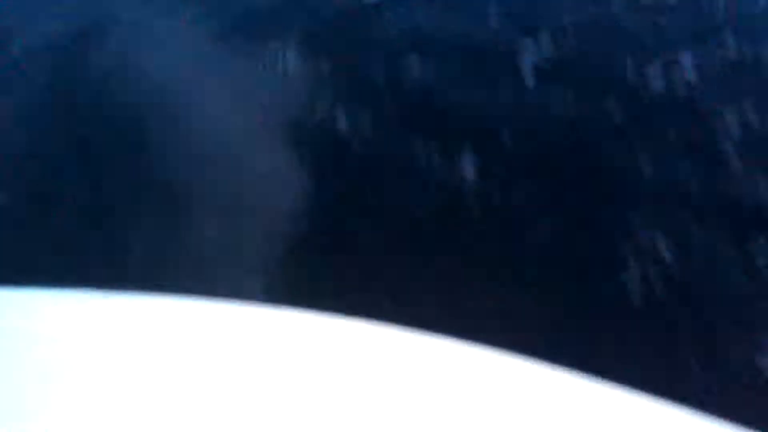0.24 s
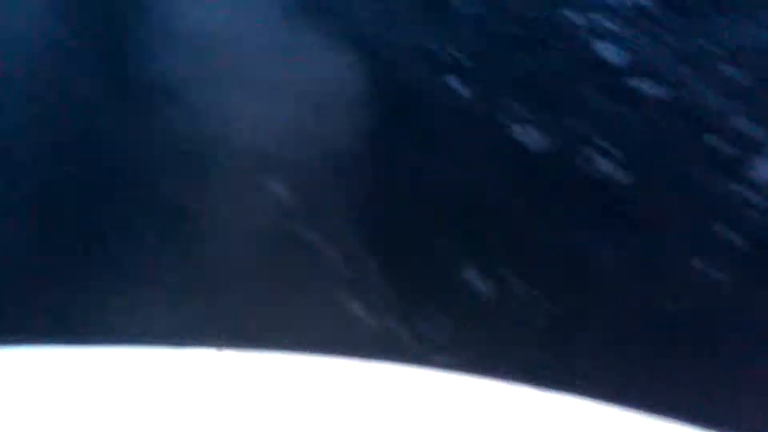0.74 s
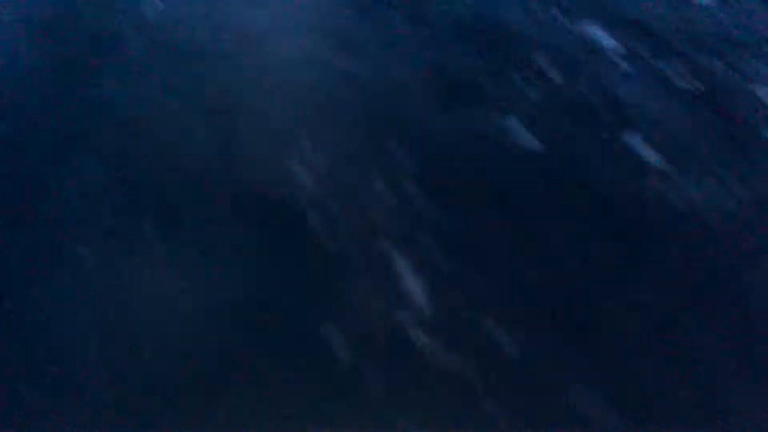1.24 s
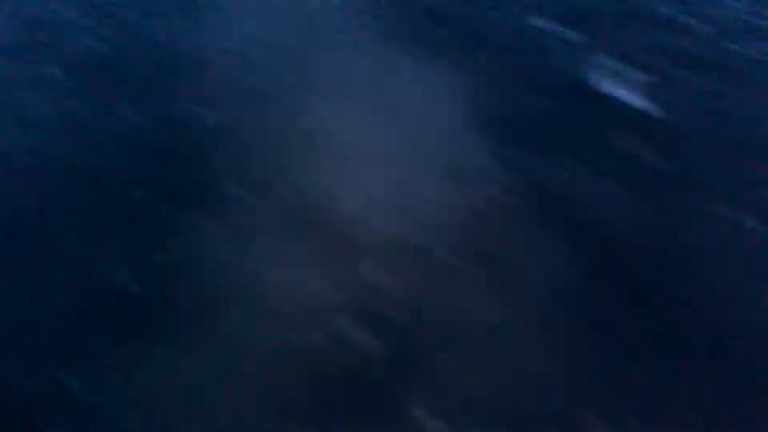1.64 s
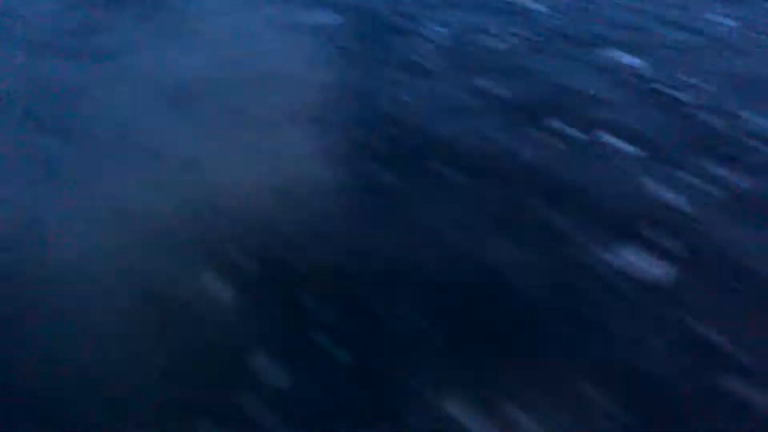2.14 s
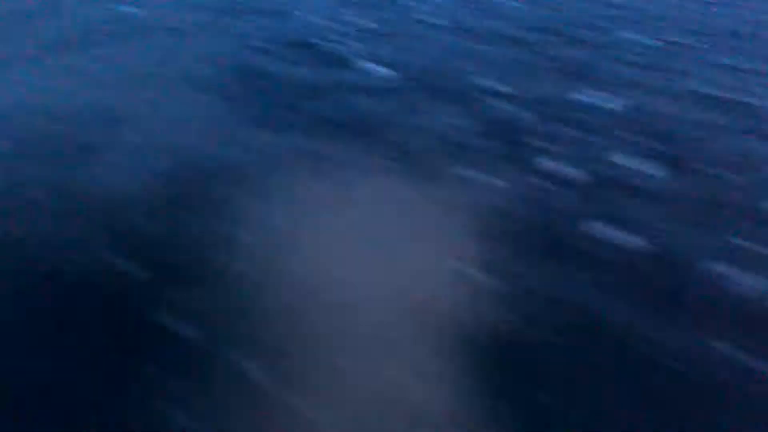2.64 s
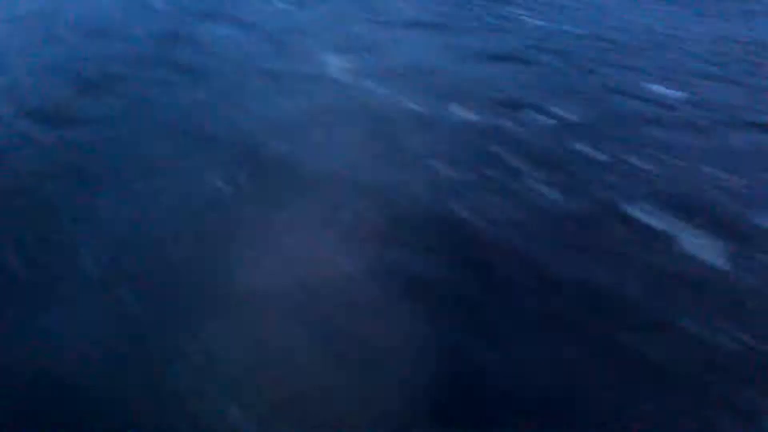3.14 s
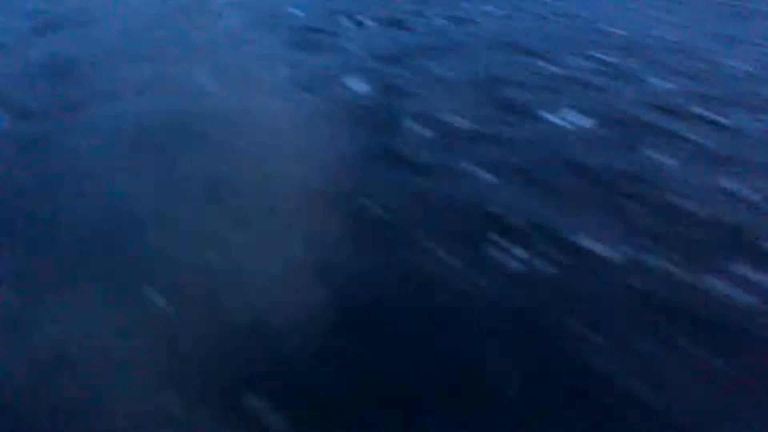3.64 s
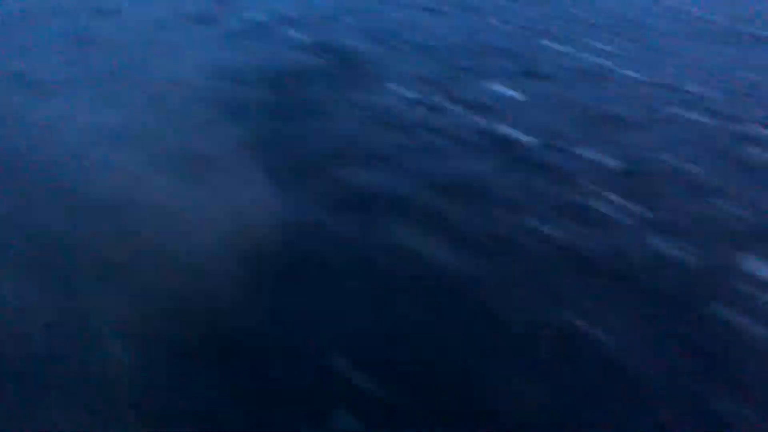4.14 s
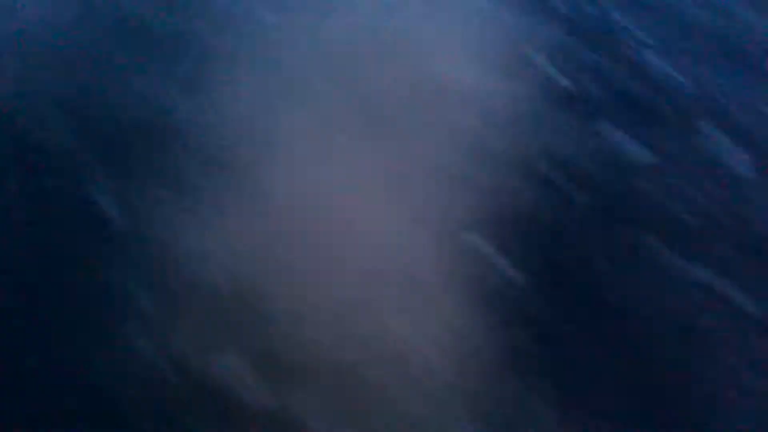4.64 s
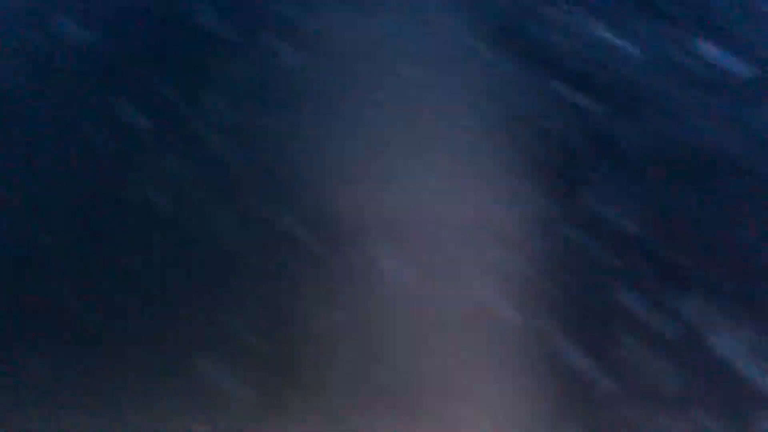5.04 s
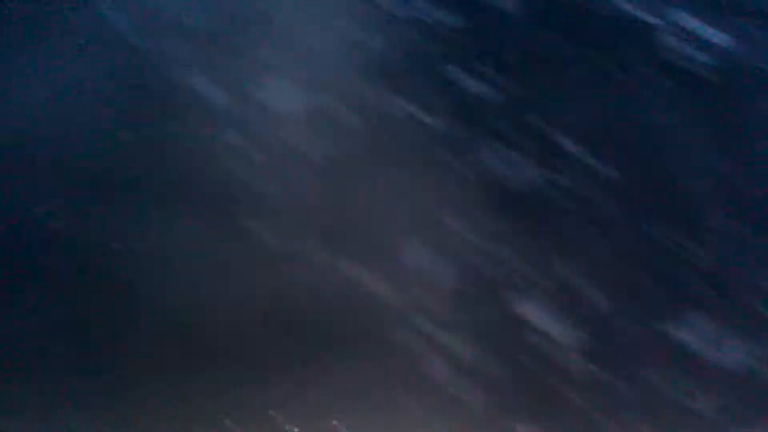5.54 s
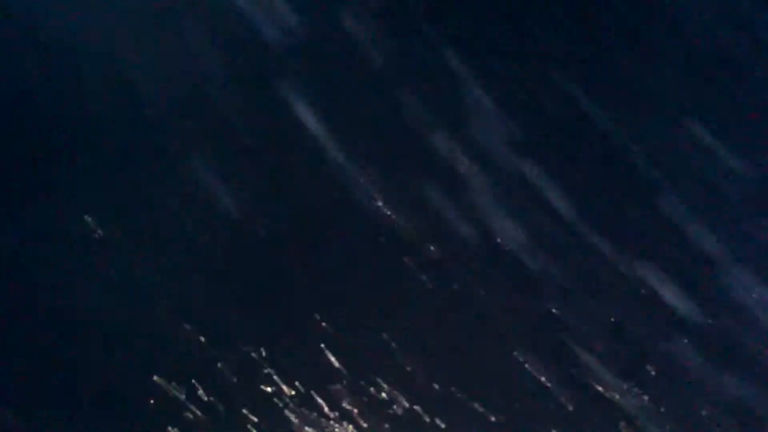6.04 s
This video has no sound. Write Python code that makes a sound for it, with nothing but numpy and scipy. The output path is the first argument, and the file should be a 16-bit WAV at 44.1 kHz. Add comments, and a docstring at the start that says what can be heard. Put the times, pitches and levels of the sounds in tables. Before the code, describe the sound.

Close, even putt-putt of a small boat's two-stroke engine, mixing sharp pops and duller thumps, with faint ticking and hull wash.

```python
"""Slow two-stroke boat on a lake

A single cylinder, heard on board close to its exhaust pipe. Each opening of the port sends a pressure
pulse and a burst of turbulence up the pipe, where they echo; the scavenging air follows as a puff.
A full charge barks and cracks, a thin one only thumps, a misfire chuffs. Pump and linkage tick
between the beats, over hull wash mixed with engine clatter and a bright hiss."""
import sys
import numpy as np
from scipy import signal
from scipy.fft import rfft, irfft
from scipy.io import wavfile
from scipy.ndimage import uniform_filter1d

SR = 44100
rng = np.random.default_rng(int(sys.argv[2]) if len(sys.argv) > 2 else 0)


def put_to_file(sound):
    """Save the sound as 16-bit audio at rate SR, in the file named by the first command-line argument."""
    columns = np.atleast_2d(sound).T  # one column per channel
    safe = np.clip(columns, -1, 1)
    whole_steps = np.round(safe * 32767)
    wavfile.write(sys.argv[1], SR, whole_steps.astype(np.int16))


N = 277830
SPAN = 16384   # samples that one event may ring
HZ = np.fft.rfftfreq(SPAN, 1 / SR)
AGE = np.arange(SPAN) / SR - .02   # seconds from an event's start, with a short pre-roll

# Exhaust beats, one a turn: start_s, pulse_db, bark_db, bark_hz, crack_db, puff_db
BEATS = [(0.057, -5.5, -24.5, 720, -27.5, -40), (0.264, -6.5, -26.5, 1680, -43.5, -38),
         (0.472, -26.5, -60, 710, -65, -45.5), (0.703, -6, -14.5, 690, -23.5, -34.5),
         (0.933, -5, -16.5, 1660, -27.5, -51), (1.157, -7.5, -20, 1960, -22.5, -42.5),
         (1.379, -5.5, -17, 1576, -24.5, -50), (1.594, -7, -15, 1470, -27.5, -51),
         (1.806, -6.5, -26.5, 860, -44.5, -57), (2.017, -6, -12, 1374, -21.5, -47),
         (2.225, -4.5, -28.5, 942, -44.5, -61), (2.442, -16, -60, 830, -65, -62),
         (2.676, -6, -14.5, 1630, -25.5, -44.5), (2.91, -8, -15, 1410, -26.5, -47),
         (3.141, -7.5, -17, 1460, -22.5, -43.5), (3.369, -9, -15.5, 1990, -23.5, -45),
         (3.592, -8, -16, 1360, -22, -45), (3.81, -8, -15.5, 1160, -23, -44),
         (4.023, -7, -29, 990, -30, -44), (4.235, -8, -29.5, 796, -38.5, -46.5),
         (4.45, -6, -15.5, 710, -20.5, -41), (4.664, -8, -26.5, 1600, -32.5, -43),
         (4.879, -8.5, -15.5, 730, -19.5, -40.5), (5.09, -6.5, -25, 840, -32, -42),
         (5.304, -8.5, -40, 600, -40, -46), (5.526, -9, -17.5, 1580, -26, -43),
         (5.751, -9.5, -15.5, 1310, -23.5, -43), (5.973, -7, -17, 1280, -21.5, -42),
         (6.188, -5, -14.5, 1050, -21.5, -50)]


def amp(db):
    """Decibels to gain."""
    return 10 ** (np.asarray(db) / 20)


def shaped(spectrum, shape):
    """Noise of rms 1 that follows an EQ curve and falls away outside it."""
    hz, db = np.transpose(spectrum)
    bins_hz = np.maximum(np.fft.rfftfreq(shape[-1], 1 / SR), 1)
    gain = amp(np.interp(np.log(bins_hz), np.log(hz), db, left=-90, right=-90))
    noise = irfft(rfft(rng.standard_normal(shape)) * gain, shape[-1])
    return noise / noise.std()


def smooth_noise(width, shape):
    """Random wobble of rms 1, smoothed over width points."""
    slow = uniform_filter1d(uniform_filter1d(rng.standard_normal(shape), width), width)
    return slow / slow.std()


def flicker(rate_hz, depth_db, shape):
    """Random gain that changes about rate_hz times a second."""
    return amp(depth_db * smooth_noise(int(SR / rate_hz), shape))


def swell(delay_s, rise_s, fall_s):
    """Envelope that starts softly after the delay, peaks at 1 and dies away."""
    age = np.maximum(AGE - delay_s, 0)
    envelope = (1 - np.exp(-age / rise_s)) ** 2 * np.exp(-age / fall_s)
    return envelope / envelope.max()


def burst(centre_s, rise_s, fall_s):
    """Bell-shaped envelope with unequal flanks, peaking at 1."""
    age = AGE - centre_s
    return np.exp(-(age / np.where(age < 0, rise_s, fall_s)) ** 2)


def ring(drive, hz, t60_s):
    """One resonant mode: a unit click sets a decaying sine of height 1 ringing."""
    radius, angle = amp(-60 / (t60_s * SR)), 2 * np.pi * hz / SR
    return signal.lfilter([0, np.sin(angle)], [1, -2 * radius * np.cos(angle), radius**2], drive + 1e-18)


def lifted(rows, hz, octaves, db):
    """A bell EQ boost or cut around hz."""
    bell = np.exp(-(np.log2((HZ + 1) / hz) / octaves) ** 2)
    return irfft(rfft(rows) * amp(db * bell), SPAN)


def coloured(rows, hz, width_hz, lift_db, ripple_db):
    """One resonance a row and a random ripple: the hot gas sounds other cross modes each time."""
    ripple = ripple_db * smooth_noise(90, (len(rows), len(HZ)))
    resonance = lift_db / (1 + ((HZ - hz) / width_hz) ** 2)
    return irfft(rfft(rows) * amp(resonance + ripple), SPAN)


def place(times, rows):
    """Lay each row on the timeline at its own moment."""
    track = np.zeros(N + 2 * SPAN)
    for start_s, row in zip(times, rows):
        start = SPAN + round((start_s + AGE[0]) * SR)
        track[start:start + len(row)] += row
    return track[SPAN:SPAN + N]


def wash_and_clatter():
    """Hull wash mixed with engine clatter that swells each turn; a bright hiss swells twice a turn."""
    # Spectrum of the wash and clatter: freq_hz, level_db
    wash_eq = [(15, -41), (25, 2), (40, -6), (70, -3), (161, -7), (293, -14), (373, -12), (476, -22.5),
               (1950, -23.5), (2600, -39), (4250, -34.5), (5140, -41), (6920, -41), (16000, -61)]
    # Spectrum of the hiss: freq_hz, level_db
    hiss_eq = [(2940, -42), (5000, -14), (6900, -6), (8880, -1), (9790, -4.5), (11500, -6.5), (13400, -10),
               (16000, -13)]
    # Fader ride of the hiss: time_s, gain_db
    hiss_ride = [(0.0, -48.5), (0.24, -48.5), (0.77, -59.5), (2.77, -72.5), (4.03, -67), (5.69, -66.5),
                 (6.3, -60.5)]
    beats_s = [beat[0] for beat in BEATS]
    clatter_throb = .45 + place(beats_s, [swell(0, .02, .07)] * len(BEATS))
    bed = amp(-43) * clatter_throb * shaped(wash_eq, (N,)) * flicker(90, 3, N)
    double_swell = swell(-.019, .0066, .018) + 1.75 * swell(.085, .03, .012)
    hiss_throb = .39 + place(beats_s, [double_swell] * len(BEATS))
    hiss_db = np.interp(np.arange(N) / SR, *np.transpose(hiss_ride))
    hiss = amp(hiss_db) * hiss_throb * shaped(hiss_eq, (N,)) * flicker(150, 2.5, N)
    return bed + hiss


def pump_and_linkage():
    """Each tick is a short rattle that strikes the linkage modes with new strengths."""
    # Pump strokes, about .13 s after a beat: start_s, lower_modes_db, upper_modes_db
    pump_strokes = [(0.1797, -53, -24.5), (0.382, -49.5, -49), (1.723, -52, -65), (2.1445, -53, -71),
                    (2.3534, -53.5, -66), (3.044, -64, -79), (3.9408, -49, -68), (4.156, -39, -65),
                    (4.5809, -47, -65), (5.007, -49, -68), (5.219, -50, -56), (6.0706, -54, -69),
                    (6.282, -54, -67)]
    # Linkage contacts in every turn: offset_s, lower_modes_db, upper_modes_db
    contacts = [(-.0405, 0, -6), (.067, -9, -8), (.1, -6, -13), (.131, -5, -12)]
    # Fader ride of those contacts: time_s, gain_db
    contact_ride = [(0, -58), (1.1, -62), (2, -67), (2.9, -69), (3.6, -65), (4.3, -60), (5.2, -62),
                    (6.3, -63)]
    # Modes of the linkage: pitch_hz, level_db, t60_s
    modes = [(3500, -4, .004), (4400, -3, .004), (5600, -4, .003), (6900, -7, .012), (8400, -4, .003),
             (9700, -2, .005), (12800, -5, .003)]
    faint_ticks = np.column_stack([rng.uniform(0, N / SR, 60), rng.normal(-73, 3.5, (60, 2))])
    ride_s, ride_db = np.transpose(contact_ride)
    contact_ticks = [
        (beat_s + offset_s, *rng.normal(levels_db, 3) + np.interp(beat_s, ride_s, ride_db))
        for beat_s, *_ in BEATS for offset_s, *levels_db in contacts if beat_s + offset_s < N / SR]
    ticks = np.vstack([pump_strokes, contact_ticks, faint_ticks])
    start_s, lower_db, upper_db = ticks.T[:, :, None]
    envelope = swell(0, .0002, .0012) + .15 * swell(0, .0015, .011)
    rattle = rng.standard_normal((len(ticks), SPAN // 4)) * envelope[:SPAN // 4]
    strength_db = rng.normal(0, 2, (len(ticks), len(modes)))
    ringing = 0
    for k, (hz, mode_db, t60_s) in enumerate(modes):
        tick_db = lower_db if hz < 7500 else upper_db
        ringing += amp(tick_db + mode_db + strength_db[:, [k]]) * ring(rattle, hz, t60_s)
    low_cut = signal.butter(2, 2000, "high", fs=SR, output="sos")   # small parts radiate little bass
    return signal.sosfilt(low_cut, place(start_s[:, 0], ringing))


def misfires():
    """Unburnt gas chuffs out: a lump of noise rings a short, hollow resonance."""
    # Chuffs of gas: start_s, pitch_hz, level_db, fall_s
    chuffs = [(0.482, 790, -30, .01), (2.445, 190, -24, .05), (2.46, 1300, -33, .015)]
    rows = []
    for _, hz, db, fall_s in chuffs:
        hollow = ring(rng.standard_normal(SPAN), hz, t60_s=14 / hz)
        rows.append(amp(db) * hollow / hollow.std() * swell(0, .006, fall_s))
    return place([chuff[0] for chuff in chuffs], rows)


def silencer(drive):
    """The air in the silencer rings on after each beat."""
    # Air modes: pitch_hz, relative_db, t60_s
    modes = [(164, -2.5, 0.27), (242, -1.5, 0.063), (376, -13.5, 0.1), (425, -14.5, 0.09), (515, -15, 0.1),
             (605, -12, 0.14), (692, -12.5, 0.19)]
    return sum(amp(db - 51) * ring(drive, hz, t60_s) for hz, db, t60_s in modes)


def pipe(drive, echo):
    """Sound bounces along the pipe, weaker and duller after every round trip."""
    round_trip_hz, damping_hz = 85.46, 970
    damping = .2 + .62 / (1 + (HZ / damping_hz) ** 2)
    feedback = np.clip(echo, 0, .9) * damping * np.exp(-2j * np.pi * HZ / round_trip_hz)
    return irfft(rfft(drive) / (1 - feedback), SPAN)


def port_pulse():
    """Pressure pulse as the port opens: the gas column sets off fast and swings back slowly."""
    centre_s, width_s = .0027, .002
    swing = (AGE - centre_s) / width_s
    swing /= np.where(swing > 0, 1.2, .85)
    return (swing**2 - 1) * np.exp(-swing**2 / 2)


def exhaust():
    """Pulse and turbulence of every beat drive pipe and silencer; a knock and a puff of air follow."""
    # Low turbulence: freq_hz, level_db
    bark_eq = [(150, 0), (250, -2), (472, -12), (683, -8), (741, -7.5), (1500, -7.5), (2110, -9.5),
               (2540, -33.5), (2900, -35), (3770, -105), (6380, -120)]
    # Shock edge: freq_hz, level_db
    crack_eq = [(1410, -30), (2400, 1), (2560, -8), (3540, 2.5), (3930, -1.5), (4350, 3), (5520, -11),
                (6320, -13.5), (7060, -4), (8820, -20), (10000, -18.5), (14900, -33.5), (16000, -28)]
    # Gas leaving the pipe: freq_hz, level_db
    blow_eq = [(24, -50.5), (40, 8), (171, -5), (290, -5.5), (529, -7), (1150, -22), (1480, -12.5),
               (2320, -40), (3930, -24), (5050, -45), (7000, -45.5), (16000, -51)]
    # Slow drift in the tone of a full beat: time_s, crack_hz, top_db, body_db, blow_db, knock_db
    tone_drift = [(0, 3050, -35, -13, -23.5, -58), (0.75, 3500, -35, -12, -25, -59),
                  (1.0, 4450, -24, -3, -25.5, -55), (1.8, 4300, -27, 0, -30, -57),
                  (2.2, 4400, -27, 3, -29, -52), (2.7, 3800, -24, 3, -29, -47),
                  (3.6, 4400, -17, 5, -29.5, -51), (4.5, 4300, -23, 6, -29, -47),
                  (5.0, 3400, -25, 6, -29, -47), (5.5, 3900, -20, 3, -27, -52),
                  (6.3, 3850, -16, 2, -27.5, -47)]
    start_s, pulse_db, bark_db, bark_hz, crack_db, puff_db = np.transpose(BEATS)[:, :, None]
    drift_s, *curves = np.transpose(tone_drift)
    crack_hz, top_db, body_db, blow_db, knock_db = [np.interp(start_s, drift_s, c) for c in curves]

    # A thin charge loses top, body and level.
    charge_db = bark_db + 16   # 0 for a full charge
    bright_db = np.clip(top_db + 1.8 * charge_db - crack_db, -25, 8)
    body_db += .3 * charge_db
    blow_db += .22 * np.maximum(charge_db, -55)   # even a misfire blows gas out
    knock_db += .15 * charge_db
    echo_jitter, pitch_jitter = rng.standard_normal((len(BEATS), 2)).T[:, :, None]
    echo = .44 - .02 * pulse_db + .04 * echo_jitter   # more returns after a weak pulse
    crack_hz += 200 * pitch_jitter

    shape = (len(BEATS), SPAN)
    pulse = amp(pulse_db) * port_pulse()
    growl = coloured(shaped(bark_eq, shape), bark_hz, width_hz=100, lift_db=9.5, ripple_db=3)
    edge = coloured(shaped(crack_eq, shape), crack_hz, width_hz=180, lift_db=8, ripple_db=4)
    edge = lifted(edge, hz=10000, octaves=.8, db=bright_db)
    bark = amp(bark_db) * growl * burst(.0038, .0036, .0077)
    crack = amp(crack_db) * edge * burst(.0027, .0024, .0057)

    # The gas leaves in lumps, its treble dying first.
    hollow = coloured(shaped(blow_eq, shape), bark_hz, width_hz=100, lift_db=7, ripple_db=2.5)
    blow = amp(blow_db) * hollow * swell(.012, .002, .036) * flicker(183, 3, shape)
    sputter = amp(blow_db - 9) * growl * swell(.0099, .0094, .013) * flicker(210, 7.9, shape)
    gas = lifted(bark + blow, hz=380, octaves=.6, db=body_db) + crack + sputter

    # A narrow knock comes after two round trips of the pipe, then the scavenging air.
    knock = amp(knock_db) * lifted(edge, hz=3900, octaves=.3, db=14) * burst(.023, .0022, .0066)
    puff = amp(puff_db) * (1.25 * edge + 1.28 * growl) * swell(.0398, .0013, .0079)
    return place(start_s[:, 0], pipe(pulse + gas, echo) + silencer(pulse + 2.18 * gas) + knock + puff)


def scene():
    """Engine over water, in mono."""
    return (exhaust() + misfires() + pump_and_linkage() + wash_and_clatter())[None]


def record(dry):
    """A small microphone: no deep bass, a dip from its housing, rounded peaks and the top cut off."""
    low_cut_hz, dip_hz, dip_width_hz, high_cut_hz = 43, 2620, 400, 16900
    thin = signal.sosfilt(signal.butter(2, low_cut_hz, "high", fs=SR, output="sos"), dry)
    dipped = thin - .22 * signal.lfilter(*signal.iirpeak(dip_hz, dip_hz / dip_width_hz, SR), thin)
    rounded = 1.281 * np.tanh(dipped / 1.23)
    return signal.sosfilt(signal.cheby2(12, 70, high_cut_hz, fs=SR, output="sos"), rounded)


dry = scene()
out = record(dry)
put_to_file(out)
```